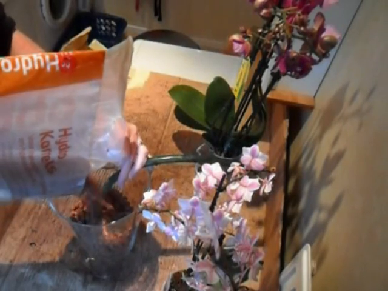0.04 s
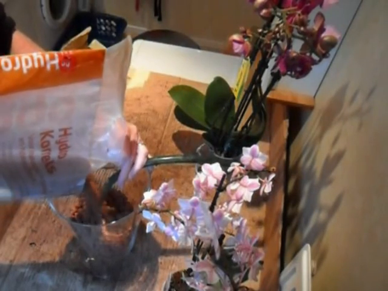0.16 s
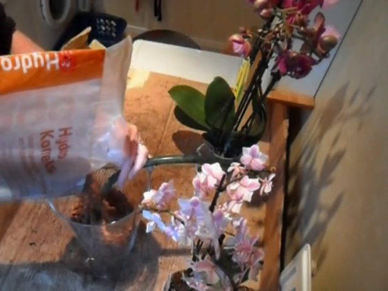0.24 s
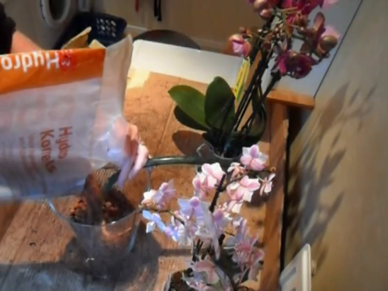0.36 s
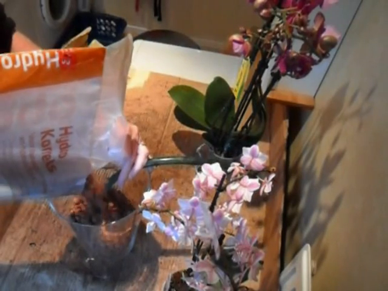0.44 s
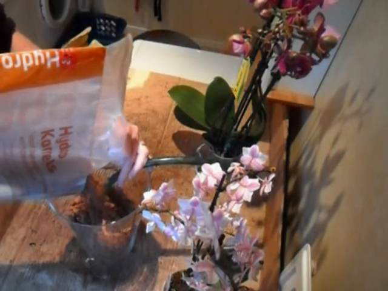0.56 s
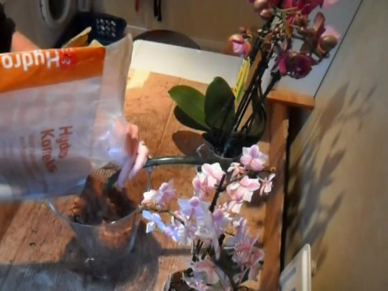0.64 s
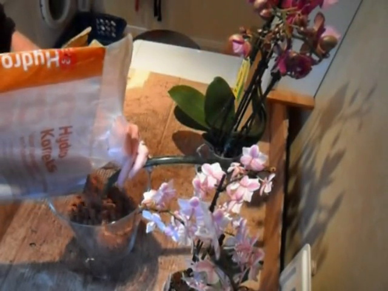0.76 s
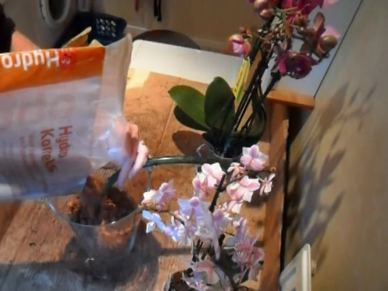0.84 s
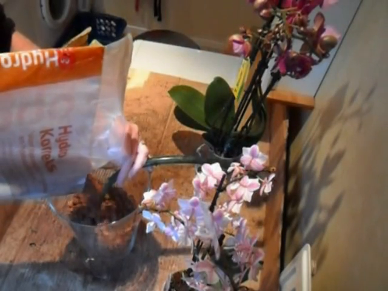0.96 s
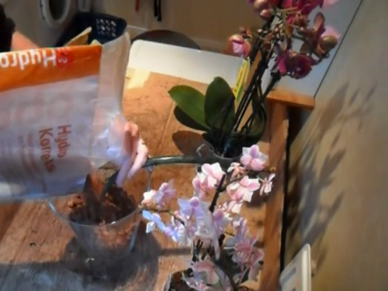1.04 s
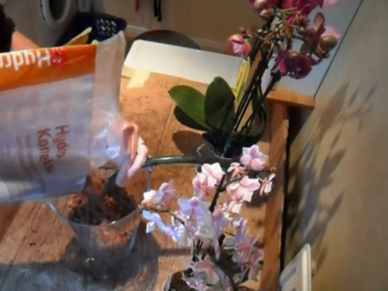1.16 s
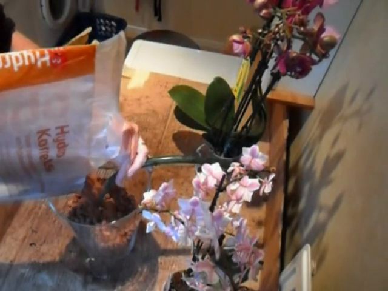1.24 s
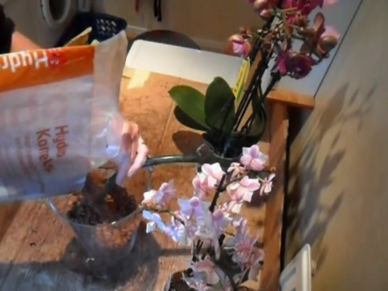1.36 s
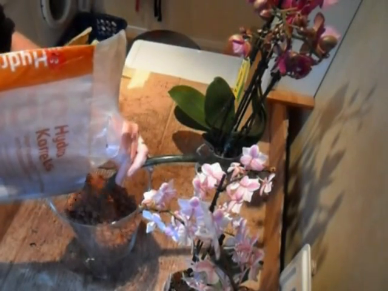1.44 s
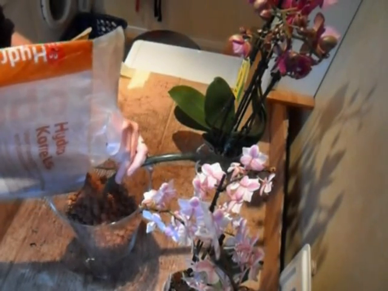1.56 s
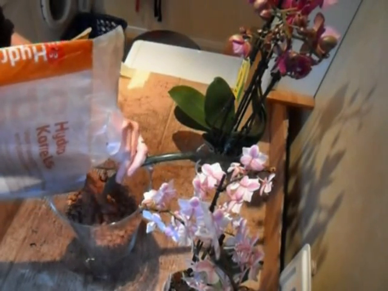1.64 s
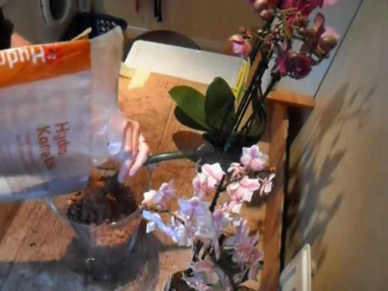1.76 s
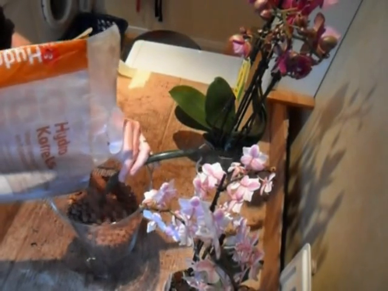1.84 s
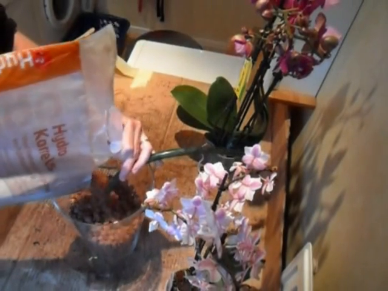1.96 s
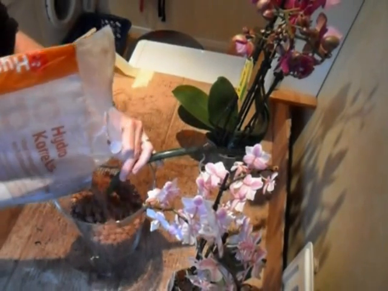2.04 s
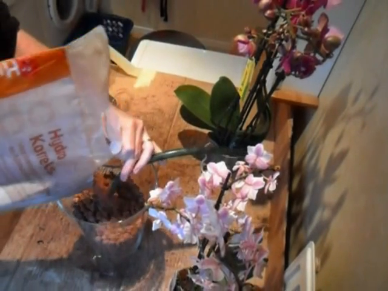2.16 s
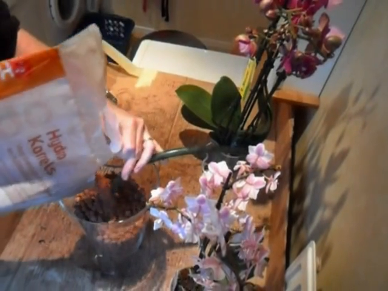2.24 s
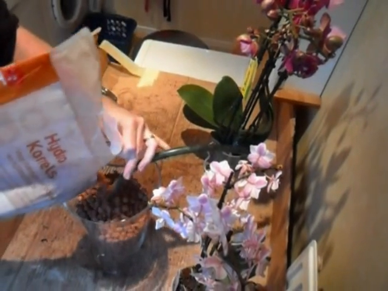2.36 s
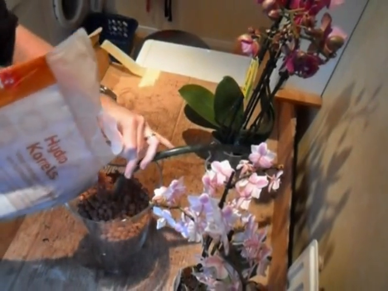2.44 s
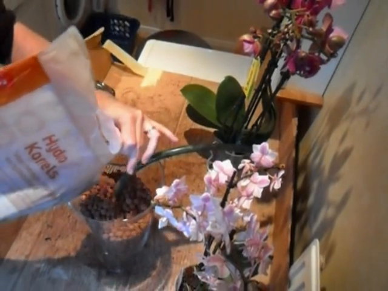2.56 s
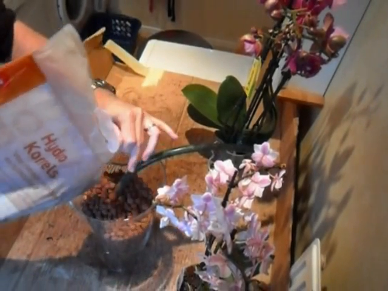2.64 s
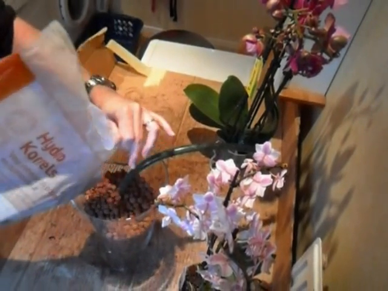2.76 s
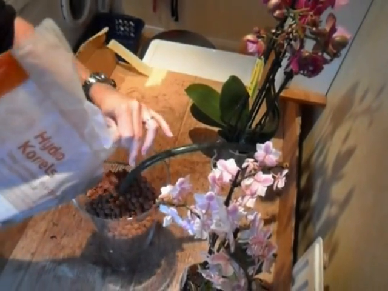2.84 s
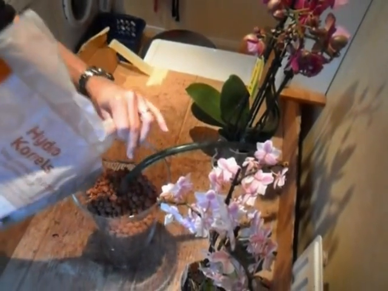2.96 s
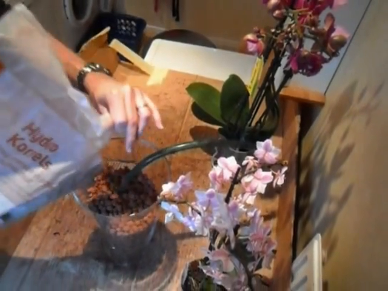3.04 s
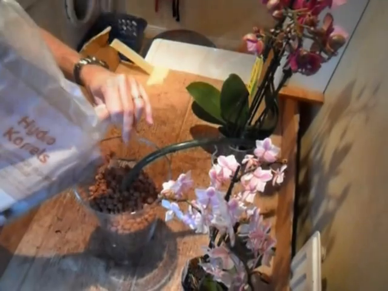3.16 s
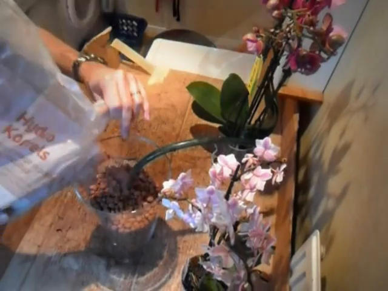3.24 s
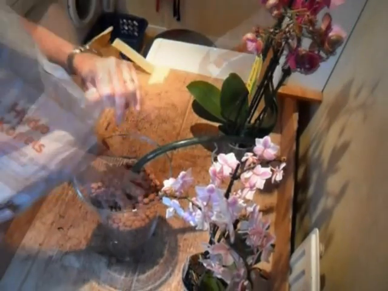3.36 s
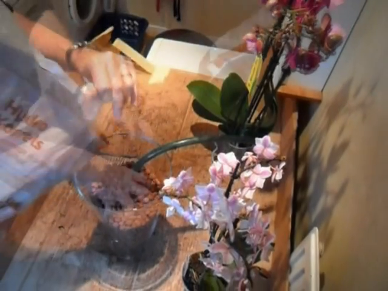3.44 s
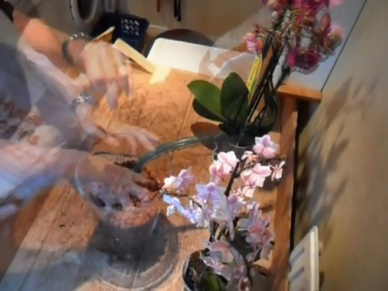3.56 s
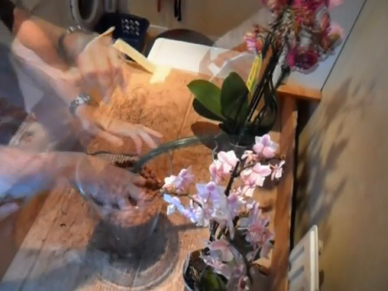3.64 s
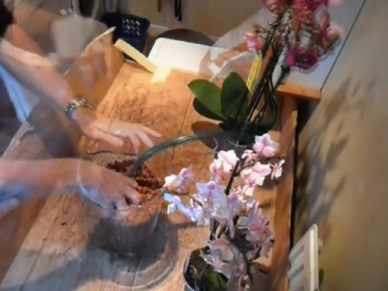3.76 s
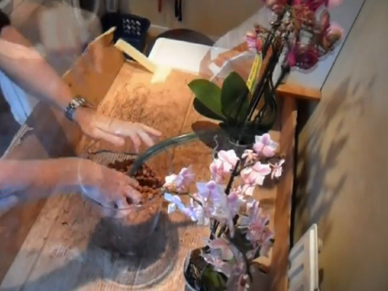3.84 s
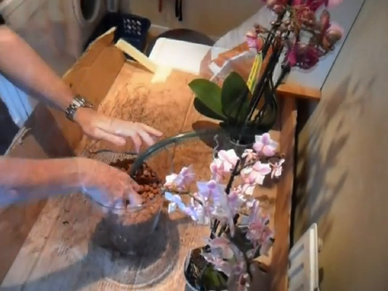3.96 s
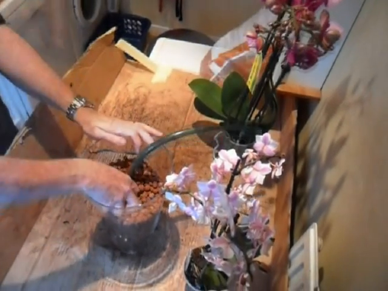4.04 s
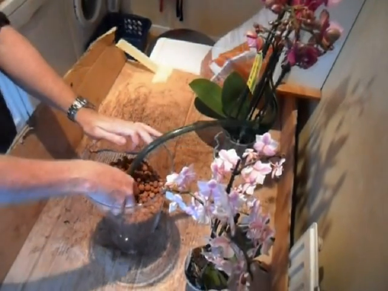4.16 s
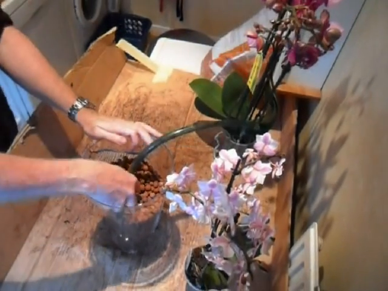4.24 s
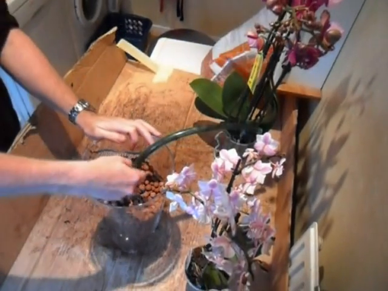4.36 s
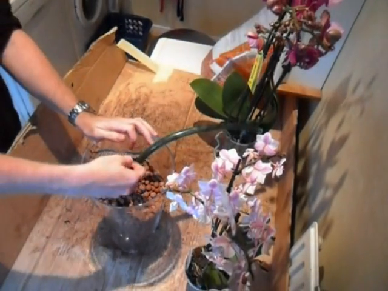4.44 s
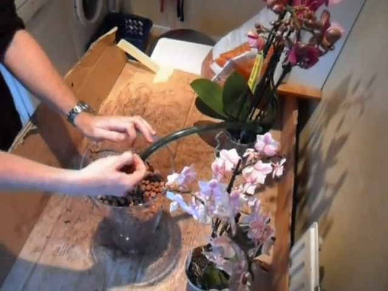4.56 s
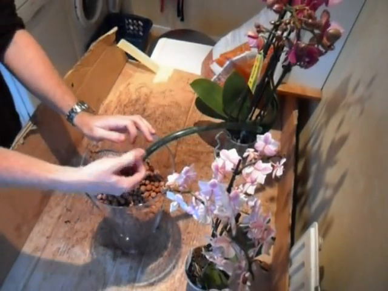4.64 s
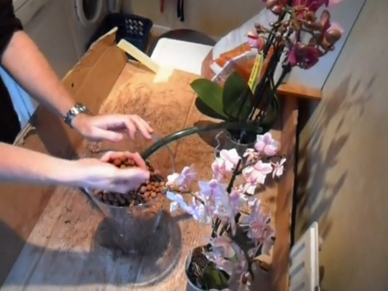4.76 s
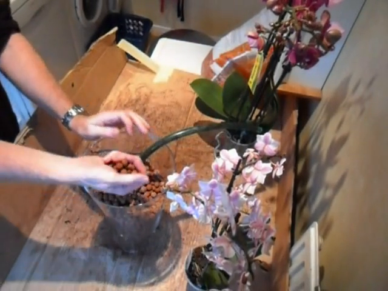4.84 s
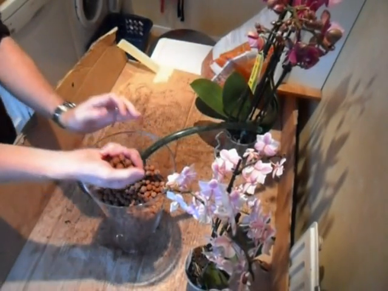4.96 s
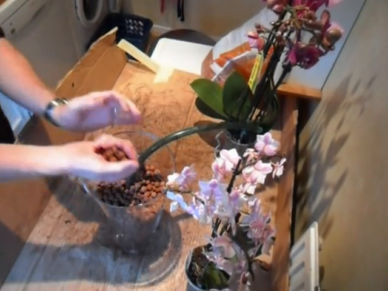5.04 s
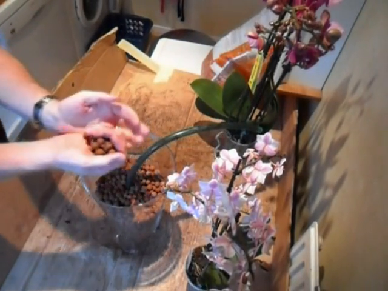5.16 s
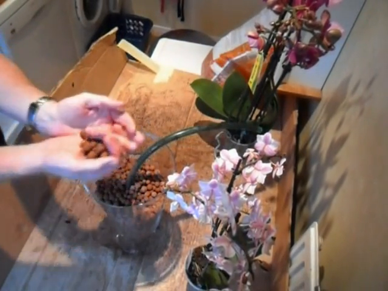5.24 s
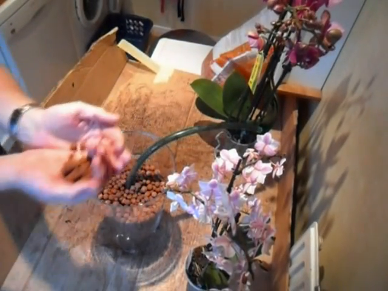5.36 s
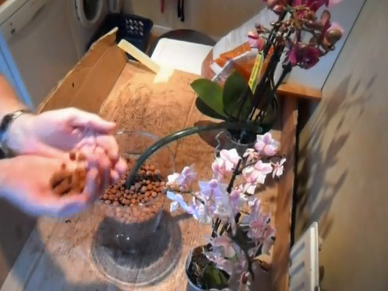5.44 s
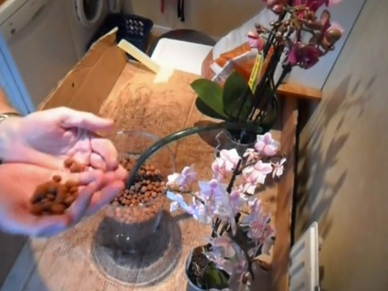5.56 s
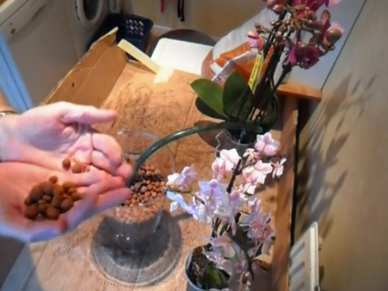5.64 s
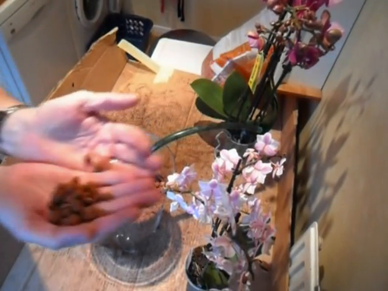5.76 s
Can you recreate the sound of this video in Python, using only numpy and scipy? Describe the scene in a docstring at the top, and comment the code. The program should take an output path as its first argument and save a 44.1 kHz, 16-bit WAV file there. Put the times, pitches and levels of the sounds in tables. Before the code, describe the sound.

The sound begins mid-pour. From 0 to about 1 second, hard clay pellets clatter densely into a glass vase, with sharp irregular clacks, a bright glassy ring and a soft hollow patter beneath. From 1 to 2.4 seconds the stream weakens and the ring becomes shorter and duller as the vase fills; one last strong clack comes near 2.4. Until 3.3 the pellets thin to single clicks while the plastic bag ticks, knocks and rustles dully as it is lifted. Around 3.35 there is a low soft thud, with further bumps near 3.55 and 3.7. Two short digs into the pellets rattle and grind at about 3.75 and 4.1, the second with a brief hum of the wall. Tiny ticks follow, then two muffled thumps near 4.9 and 5.0. Quiet room hiss and a low rumble, easing after 4 seconds, remain to the end. The room is small, with a short tail.

```python
"""Fired clay pellets pour from a plastic bag into a glass vase in a small room.
Random collisions make them patter on the heap and clack on the glass, whose wall and air ring as modes.
The stream thins to separate clicks; the bag crinkles, rustles and bumps as shaped noise and damped tones.
A hand then digs twice into the pellets: they rattle and grind, and soft thumps follow.
"""
import sys
import numpy as np
from scipy import signal
from scipy.fft import rfft, irfft, next_fast_len
from scipy.io import wavfile

SR = 44100
rng = np.random.default_rng(int(sys.argv[2]) if len(sys.argv) > 2 else 0)


def dump_mix(stems):
    """Bounce the given channels to the path in sys.argv[1] as a 16-bit WAV at rate SR."""
    frames = np.atleast_2d(stems).T  # one column per channel
    limited = np.clip(frames, -1, 1)  # hard clip at full scale
    pcm = np.round(limited * 32767).astype(np.int16)
    wavfile.write(sys.argv[1], SR, pcm)


N = 255773
TOP_HZ = 10900  # no room air and no pellet pitch above this


def amp(db):
    """Decibels to gain."""
    return 10 ** (np.asarray(db) / 20)


def unit(x):
    """Scale to rms 1."""
    return x / np.sqrt(np.mean(x ** 2) + 1e-20)


def along(points, hz):
    """Read (Hz, value) points on a log frequency axis."""
    f, v = np.transpose(points)
    return np.interp(np.log(hz + 1), np.log(f), v)


def filtered(x, response):
    """Multiply the spectrum of x by a response of frequency."""
    m = next_fast_len(N + SR // 2)
    hz = np.fft.rfftfreq(m, 1 / SR)
    return irfft(rfft(x, m) * response(hz), m)[:N]


def coloured(x, spectrum, size=4096):
    """Causal minimum-phase filter of energy 1 with the given spectrum."""
    hz = np.fft.rfftfreq(size, 1 / SR)
    cepstrum = irfft(np.log(amp(along(spectrum, hz))))
    # folding the cepstrum forward in time makes the kernel causal
    cepstrum[1:size // 2] *= 2
    cepstrum[size // 2 + 1:] = 0
    kernel = irfft(np.exp(rfft(cepstrum)))
    return signal.fftconvolve(x, kernel / np.linalg.norm(kernel))[:len(x)]


def add(track, s, sound):
    """Mix a sound into a track at time s."""
    start = max(0, round(s * SR))
    part = track[start:start + len(sound)]
    part += sound[:len(part)]


def contacts(rate, spread_db, size):
    """Random impulses of uneven strength, at a mean rate per second, rms 1."""
    hit = rng.random(size) < rate / SR
    sign = rng.choice([-1, 1], size)
    strength = amp(spread_db * np.clip(rng.standard_normal(size), -2, 2))
    return unit(hit * sign * strength)


def chatter(rate, spread_db, t60):
    """Pellet collisions, each a short decaying rasp of rough clay, rms 1."""
    t = np.arange(SR // 20) / SR
    hits = contacts(rate, spread_db, N)
    power = signal.fftconvolve(hits ** 2, amp(-60 * t / t60) ** 2)[:N]
    return unit(np.sqrt(np.abs(power)) * rng.standard_normal(N))


def stroke(s, rise, hold, release):
    """Gain of one movement: it swells, holds and fades, linearly in dB."""
    range_db = 23  # below full level at the start of the rise and the end of the release
    t = np.arange(N) / SR - s
    short = np.maximum(1 - t / rise, 0) + np.maximum((t - rise - hold) / release, 0)
    return amp(-range_db * short)


def pellets(rate, scatter=0.3, cycles=11, size=96):
    """Single clicks: every pellet rings for a few cycles at the pitch of its own size, rms 1."""
    typical_hz = 6800
    count = int(rate * N / SR)
    start = rng.integers(0, N, count)
    pitch, strength = np.clip(rng.standard_normal((count, 2)), -2, 2).T[:, :, None]
    hz = typical_hz * np.exp(scatter * pitch)
    turns = hz * np.arange(size) / SR
    # a click falls 60 dB in the given number of cycles
    clicks = (hz < TOP_HZ) * amp(4 * strength - 60 * turns / cycles) * np.sin(2 * np.pi * turns)
    places = start[:, None] + np.arange(size)
    return unit(np.bincount(places.ravel(), clicks.ravel(), N)[:N])


# resonances of the air in the vase: (frequency [Hz], width [Hz], relative level [dB])
AIR_MODES = [(228, 22, -9), (281, 22, 1), (328, 36, -3), (383, 38, 3)]


def vase_air():
    """Small landings drum on the hollow of the vase, a bank of resonances, rms 1."""
    def cavity(f):
        response = 0
        for k, (centre, width, db) in enumerate(AIR_MODES):
            mode = 1j * f * width / (centre * centre - f * f + 1j * f * width)
            response = response + (-1) ** k * amp(db) * mode
        return response

    return unit(filtered(contacts(400, 2.2, N), cavity))


def fullness(s):
    """As the bag is raised the full stream (1) thins to separate clicks (0)."""
    return np.interp(s, [1.8, 2.8], [1, 0])


# the stream from the bag: (time [s], flow strength [dB])
FLOW = [(0.0, -36.5), (0.28, -38.7), (0.8, -37.7), (1.05, -42.5), (1.38, -41), (1.47, -47.5), (1.6, -41),
        (2.3, -43.7), (2.55, -49.5), (2.85, -59.5), (3.1, -79)]
# spectrum of pellets clicking: (frequency [Hz], relative level per Hz [dB])
CLAY_SPECTRUM = [(100, -44), (300, -46), (1200, -14), (2100, -4.3), (3100, -3.7), (3900, -5.8), (4900, -.5),
                 (6200, 1), (6650, -3), (7100, 1), (7600, -1.5), (9600, 1.5), (11000, -5.5)]
# spectrum of landings on the heap: (frequency [Hz], relative level per Hz [dB])
HEAP_SPECTRUM = [(100, -28), (170, -15), (240, -5), (500, -2.5), (680, 3.5), (1100, 2.5), (1500, -3),
                 (2000, 0.5), (3200, -6), (6000, -6.5), (11000, -15)]


def stream():
    """Falling pellets click on each other, patter on the heap and stir the air in the vase."""
    full_db = -37  # full flow
    patter_db, hollow_db = -44.2, -51.7  # levels at full flow
    patter_follows, hollow_follows = .42, .7  # dB lost for each dB of flow
    t = np.arange(N) / SR
    flow_db = np.interp(t, *np.transpose(FLOW), right=-200)
    drop_db = flow_db - full_db
    full = fullness(t)
    dense = chatter(rate=600, spread_db=3.5, t60=.007)
    sparse = chatter(rate=160, spread_db=3, t60=.007)
    rasp = coloured(np.sqrt(full) * dense + np.sqrt(1 - full) * sparse, CLAY_SPECTRUM)
    clicks = .6 * pellets(rate=450)
    clatter = amp(flow_db - 1) * (rasp + clicks)
    landings = chatter(rate=800, spread_db=3, t60=.008)
    patter = amp(patter_db + patter_follows * drop_db) * coloured(landings, HEAP_SPECTRUM)
    hollow = amp(hollow_db + hollow_follows * drop_db) * vase_air()
    return clatter, patter + hollow


# clumps striking the glass: (time [s], level [dB], time for their bounces to fall 20 dB [s])
CLACKS = [(.001, -20, .04), (.011, -14, .05), (.036, -21, .04), (.077, -17.5, .07), (.096, -14, .06),
          (.108, -17, .04), (.134, -16.5, .07), (.162, -21, .05), (.203, -21, .02), (.221, -19, .03),
          (.227, -16, .035), (.283, -17, .025), (.296, -20, .03), (.308, -20, .03), (.3316, -20, .02),
          (0.3592, -10, .02), (.377, -21, .03), (.429, -17, .03), (.447, -16.5, .025), (0.4644, -13, .04),
          (.487, -17.5, .03), (.523, -17, .03), (.5516, -18, .03), (.577, -18, .04), (.616, -13.5, .03),
          (.641, -18.5, .04), (0.6775, -13, .04), (.69, -17, .04), (.719, -18, .04), (.746, -17, .035),
          (.764, -20, .035), (.795, -17.5, .04), (0.8083, -16, .06), (0.8718, -12, .014), (.892, -17, .04),
          (.9016, -15, .04), (.937, -18, .08), (.967, -15.5, .04), (.979, -17, .04), (1.002, -23, .03),
          (1.016, -24, .015), (1.055, -23, .015), (1.102, -24, .05), (1.115, -19, .05), (1.135, -17, .05),
          (1.161, -23, .03), (1.18, -23, .04), (1.198, -22, .03), (1.2055, -14.5, .06), (1.238, -22, .03),
          (1.262, -23, .03), (1.297, -20, .025), (1.324, -24, .025), (1.338, -23, .02), (1.357, -22, .02),
          (1.3618, -15.7, .04), (1.394, -17, .05), (1.421, -22, .03), (1.4257, -20, .03), (1.488, -26, .02),
          (1.5115, -21, .012), (1.532, -25, .02), (1.55, -20, .05), (1.577, -17.5, .04), (1.646, -18, .05),
          (1.663, -15, .07), (1.69, -19, .06), (1.718, -21, .04), (1.788, -18, .03), (1.807, -24, .02),
          (1.821, -22, .025), (1.855, -22, .015), (1.875, -25, .02), (1.893, -16.5, .035),
          (1.92, -20.5, .025), (1.941, -18.5, .025), (1.979, -27, .012), (1.9984, -17.5, .02),
          (2.0205, -23.5, .02), (2.0395, -16, .035), (2.065, -25, .04), (2.126, -24, .015),
          (2.156, -24, .02), (2.172, -24, .015), (2.2019, -17.5, .025), (2.226, -26, .025),
          (2.241, -18.5, .035), (2.26, -21, .025), (2.298, -25, .03), (2.307, -24, .03),
          (2.34, -18.5, .035), (2.38, -26, .02), (2.4172, -15.5, .042), (2.536, -29, .035),
          (2.6178, -27, .025), (2.748, -24, .018), (2.775, -25, .03), (3.5155, -27.5, .035),
          (3.5374, -29, .055), (3.813, -34, .02), (4.062, -33, .04), (4.088, -33, .02), (4.193, -35, .015),
          (4.2095, -27, .07), (4.4785, -42, .02), (4.5798, -42, .05), (4.618, -47, .025),
          (4.7375, -38.5, .04)]
# spectrum of the duller body of a clack: (frequency [Hz], relative level per Hz [dB])
BODY_SPECTRUM = [(300, -19), (1000, -8), (2000, 11), (3200, 9), (5000, 8), (9000, -13)]


def clacks(crack_t60=0.03, rise=0.0012, spill_db=-8.5, body_db=-25):
    """Clumps of pellets hit the wall: a hard noisy crack, then a spill of smaller bounces."""
    edge, body, t = np.zeros(N), np.zeros(N), np.arange(SR // 5) / SR
    for s, db, spill in CLACKS:
        # row 0 feeds the edge, row 1 the body
        crack = amp(-60 * t / crack_t60) * rng.standard_normal((2, len(t)))
        hits = np.array([contacts(3200, 3.3, len(t)) for _ in crack])
        bounces = amp(spill_db - 20 * t / spill) * hits
        blow = amp(db) * (1 - np.exp(-t / rise)) * (crack + bounces)
        # each blow stresses a band of its own
        band = signal.iirpeak(rng.uniform(4500, 10000), 5, SR)
        own = signal.lfilter(*band, blow[0])
        add(edge, s, amp(-7.5) * (blow[0] + own))
        add(body, s, amp(body_db) * blow[1])
    return coloured(edge, CLAY_SPECTRUM) + coloured(body, BODY_SPECTRUM)


def glass(blows, modes):
    """The wall rings in decaying modes; blows land all round it and so push them either way."""
    t = np.arange(SR // 2) / SR
    ring = sum(amp(db - 60 * t / t60) * np.sin(2 * np.pi * hz * t) for hz, db, t60 in modes)
    pushes = blows * rng.choice([-1, 1], N)
    return signal.fftconvolve(pushes, ring / np.linalg.norm(ring))[:N]


# modes of the free wall: (frequency [Hz], relative level [dB], t60 [s])
FREE_WALL = [(1997, -13, .12), (2729, -10, .15), (3203, -9, .16), (4091, -13, .15), (4653, -7, .15),
             (4963, -2.5, .13), (5113, -2, .13), (5524, -5, .15), (5922, -1, .12), (6131, -1, .13),
             (6353, -3, .15), (6983, -3, .1), (7374, -7, .15), (7939, -7, .15), (8398, -9, .15),
             (8753, -6, .12), (9368, -6, .1), (10138, -7, .15)]
# modes of the wall damped by pellets packed against it: (frequency [Hz], relative level [dB], t60 [s])
FILLED_WALL = [(1130, -13, .05), (2060, -7, .08), (2440, -8, .06), (2630, -7, .06), (3150, -6, .06),
               (5125, 0, .07), (5310, -1, .05), (5890, -2, .06), (6100, 0, .07), (7060, 2, .08),
               (7260, -1, .06), (7900, -4, .06), (9400, -2, .05)]
# the packed pellets take over the ring of the wall: (from [s], to [s])
FILL_SPAN = (1.2, 2.3)


def vase(blows, grind):
    """The wall rings brightly at first and more dully once it is full; grinding pellets rub it too."""
    free_db, filled_db, grind_db = -10.3, -13, -9  # ring over the sounds that drive it
    packed = np.interp(np.arange(N) / SR, FILL_SPAN, [0, 1])
    free = amp(free_db) * np.sqrt(1 - packed) * blows
    damped = amp(filled_db) * np.sqrt(packed) * blows + amp(grind_db) * grind
    return glass(free, FREE_WALL) + glass(damped, FILLED_WALL)


# decay of the room: (frequency [Hz], t60 [s])
ROOM_DECAY = [(200, 0.25), (1500, 0.56), (5000, 0.26), (11000, 0.16)]


def room(x, wet_db=-7, gap=.003, count=12):
    """A short diffuse noise tail, decaying per band; it crossfades to other echoes every 30 ms."""
    hz, t, z = signal.stft(rng.standard_normal((count, SR // 3)), SR, nperseg=256)
    decay = amp(-60 * t / along(ROOM_DECAY, hz)[:, None])
    tails = signal.istft(z * decay, SR, nperseg=256)[1]
    tails = tails / np.linalg.norm(tails, axis=1, keepdims=True)
    tails = np.pad(tails, ((0, 0), (round(gap * SR), 0)))
    # the tails take turns, so that sounds from different spots meet different echoes
    spot = np.arange(N) / SR / .03
    distance = np.abs((spot - np.arange(count)[:, None] + 1) % count - 1)
    shares = np.cos(np.pi / 2 * np.minimum(distance, 1))
    wet = signal.fftconvolve(x * shares, tails, axes=1)[:, :N].sum(axis=0)
    return x + amp(wet_db) * wet


# spectrum of the room air and hiss: (frequency [Hz], relative level [dB])
AIR_SPECTRUM = [(12, -40), (20, -9), (53, 0.5), (107, -11), (159, -3.5), (206, -4), (241, -5.5),
                (275, -3.5), (397, -6.5), (744, -10), (1070, -12.5), (1190, -12.5), (7090, -18),
                (10500, -22), (13600, -57.5), (22000, -120)]
# spectrum of the low rumble: (frequency [Hz], relative level [dB])
RUMBLE_SPECTRUM = [(12, -37), (20, 7), (32, -6), (81, 8.5), (107, -0.5), (135, 7), (162, -12), (200, -10),
                   (260, -38.5), (440, -120)]


def background(rumble_db=-69, rest_db=-74.5):
    """Steady room air and hiss as shaped noise, over a low rumble that eases from 3.9 to 4.4 s."""
    air = unit(filtered(rng.standard_normal(N), lambda f: amp(along(AIR_SPECTRUM, f)) * (f < TOP_HZ)))
    rumble = unit(filtered(rng.standard_normal(N), lambda f: amp(along(RUMBLE_SPECTRUM, f))))
    level_db = np.interp(np.arange(N) / SR, [3.9, 4.4], [rumble_db, rest_db])
    return amp(-63.0) * air + amp(level_db) * rumble


# clumps landing on the heap: (time [s], peak level [dB])
BOOMS = [(.572, -40), (.75, -42), (1.053, -41), (1.287, -40), (1.52, -43), (2.025, -42), (2.955, -43),
         (3.1, -44), (3.548, -45)]


def booms(rise=.004):
    """A heavy landing rings the air in the vase: each resonance decays by its own width."""
    out, t = np.zeros(N), np.arange(SR // 6) / SR
    for s, db in BOOMS:
        ring = np.zeros(len(t))
        for hz, width, level in AIR_MODES:
            decay = np.exp(-np.pi * width * t)
            ring += amp(level + rng.normal(0, 2)) * decay * np.sin(2 * np.pi * hz * t)
        ring = ring * (1 - np.exp(-t / rise))
        add(out, s, amp(db) * ring / np.abs(ring).max())
    return out


# knocks of the bag and the hands:
# (time [s], level [dB], centre [Hz], crack over level [dB], softness [time stretch])
KNOCKS = [(2.446, -25, 1300, -10, 1), (2.459, -26.5, 850, -15, 1.1), (2.524, -33, 1060, -12, 1.2),
          (2.93, -29.5, 1050, -15, 1), (2.954, -33, 310, -16, 2.4), (2.956, -31, 1200, -19, .9),
          (3.096, -38, 330, -16, 2.4), (3.106, -31.5, 900, -4, 1.2), (3.1062, -28, 3100, -11, .6),
          (3.13, -40, 1000, -5, 2.5), (3.25, -41, 620, -12, 1.6), (3.328, -35, 2060, -11, .8),
          (3.358, -41, 1500, -4, 2.4), (3.539, -33, 2600, -7, 1), (3.546, -26, 940, -13, 1.6),
          (3.562, -38, 900, -4, 3), (3.724, -35, 800, -13, 2)]
# the dull ring that they share: (ratio to the centre, relative level [dB])
KNOCK_MODES = [(.68, -7), (.86, -2), (1.17, -1), (1.55, -6)]
# spectrum of their crack: (frequency [Hz], relative level per Hz [dB])
CRACK_SPECTRUM = [(100, -43), (300, 1.5), (1000, 1.5), (2000, -2.5), (3600, -1), (5500, -5), (10000, -12)]


def knocks(t60=0.03, rise=0.0006, ring_db=-8, crack_t60=0.028):
    """Bumps: a few well damped modes struck at once, under a rough crack of noise."""
    out, cracks, t = np.zeros(N), np.zeros(N), np.arange(SR // 6) / SR
    for s, db, hz, crack_db, slow in KNOCKS:
        tone = np.zeros(len(t))
        for ratio, level in KNOCK_MODES:
            push = amp(level) * rng.choice([-1, 1])
            mode_hz = hz * ratio * rng.normal(1, .03)
            tone += push * np.sin(2 * np.pi * mode_hz * t)
        # a softer contact swells and dies more slowly
        age = t / slow
        add(out, s, amp(db + ring_db - 60 * age / t60) * (1 - np.exp(-age / rise)) * tone)
        add(cracks, s, amp(db + crack_db - 60 * age / crack_t60) * rng.standard_normal(len(t)))
    return out + coloured(cracks, CRACK_SPECTRUM)


# creases of the bag and single pellets ticking: (time [s], level [dB])
TICKS = [(2.4830, -31), (2.5249, -32), (2.5766, -29), (2.6055, -34), (2.6634, -35), (2.6809, -35),
         (2.7118, -33), (2.8166, -33), (2.8535, -37), (2.9009, -38), (3.031, -35), (3.0914, -37),
         (3.1668, -33.5), (3.1857, -37), (3.2421, -38), (3.2631, -39), (3.2965, -40), (3.3957, -36.5),
         (3.4197, -39), (3.4679, -35.5), (3.489, -42), (3.7151, -42), (3.7759, -38), (3.9321, -39),
         (3.9912, -35.5), (4.3337, -44), (4.4609, -47), (4.4795, -44), (4.5045, -50), (4.5815, -45),
         (4.6197, -48), (4.6794, -51), (4.7372, -36), (5.011, -52), (5.05, -47), (5.439, -47)]
# spectrum of the plastic film: (frequency [Hz], relative level per Hz [dB])
FILM_SPECTRUM = [(100, -38), (300, -3), (1500, -4), (4000, -4), (8000, -0.5), (11000, -2.5)]


def ticks(t60=0.011):
    """The plastic film and stray pellets make short dry ticks of decaying noise."""
    out, t = np.zeros(N), np.arange(SR // 30) / SR
    for s, db in TICKS:
        add(out, s, amp(db - 60 * t / t60) * rng.standard_normal(len(t)))
    return coloured(out, FILM_SPECTRUM)


# the bag lifted away: (start [s], rise [s], hold [s], release [s], level [dB])
LIFT = (2.74, .2, .2, 1.7, -52.5)
# spectrum of pellets sliding inside the bag: (frequency [Hz], relative level per Hz [dB])
SLIDE_SPECTRUM = [(100, -26), (220, -6), (500, -4), (680, 3), (1100, 2.5), (1500, -3), (2100, -2),
                  (3200, -6), (6000, -10), (11000, -19)]


def lifting(hollow_db=-7.5, film_db=-20):
    """Pellets slide back down the raised bag, a dull rustle over the mouth of the vase; the film swishes."""
    *shape, db = LIFT
    slides, creases = [chatter(rate=800, spread_db=3, t60=.008) for _ in range(2)]
    rustle = coloured(slides, SLIDE_SPECTRUM)
    swish = amp(film_db) * coloured(creases, FILM_SPECTRUM)
    hollow = amp(hollow_db) * vase_air()
    return amp(db) * stroke(*shape) * (rustle + swish + hollow)


# low hum of the bag being moved: (start [s], rise [s], hold [s], release [s], level [dB])
DRAG = (3.3, .2, .25, .6, -67.5)


def thud(s=3.349, hz=80, db=-46, t60=0.15, rise=.008):
    """The heavy bag bumps down with one low, soft thud; noise hums on that note while it is moved."""
    out, t = np.zeros(N), np.arange(SR // 2) / SR
    swell = 1 - np.exp(-t / rise)
    add(out, s, amp(db - 60 * t / t60) * swell * np.sin(2 * np.pi * hz * t))
    *shape, hum_db = DRAG
    hum = unit(signal.lfilter(*signal.iirpeak(hz, 14, SR), rng.standard_normal(N)))
    return out + amp(hum_db) * stroke(*shape) * hum


# the hand in the heap, two digs and a faint last stroke:
# (start [s], rise [s], hold [s], release [s], rattle level [dB], grinding level [dB])
SCOOPS = [(3.69, .12, .045, .3, -45.5, -44.5), (4.033, .033, .08, .25, -46.3, -45.7),
          (4.38, .08, .03, .6, -65, -70)]
# spectrum of pellets grinding: (frequency [Hz], relative level per Hz [dB])
GRIND_SPECTRUM = [(120, -14), (450, -15), (650, -2), (900, -6), (1130, -1), (1400, -8), (2500, -1),
                  (4000, -5), (10000, -15.5)]


def digging(scrape_db=-8):
    """Fingers push into the heap: pellets grind, rattle and catch on each other."""
    bright = sum(amp(db) * stroke(*shape) for *shape, db, _ in SCOOPS)
    dull = sum(amp(db) * stroke(*shape) for *shape, _, db in SCOOPS)
    clicks, rubs = [chatter(rate=800, spread_db=2.5, t60=.007) for _ in range(2)]
    # single pellets catch under the fingers
    rattle = coloured(clicks, CLAY_SPECTRUM) + amp(scrape_db) * pellets(rate=400)
    grind = amp(-3) * coloured(rubs, GRIND_SPECTRUM) + amp(-14.5) * vase_air()
    return bright * rattle, dull * grind


# pellets dragged along the wall: (start [s], rise [s], hold [s], release [s])
RUB = (4.09, .03, .03, .12)


def rubbing(db=-56):
    """Pellets dragged along the wall wake its lowest filled mode, which hums briefly."""
    hum = unit(glass(contacts(900, 2, N), FILLED_WALL[:1]))
    return amp(db) * stroke(*RUB) * hum


# hands gathering pellets: (time [s], level [dB], pitch [Hz], hold [s])
THUMPS = [(4.923, -54.5, 410, .018), (5.006, -54, 675, .018)]
# modes of a thump: (ratio to the pitch, relative level [dB])
THUMP_MODES = [(.79, -7), (1, 0), (1.57, -10)]
# spectrum of the skin's rustle: (frequency [Hz], relative level per Hz [dB])
SKIN_SPECTRUM = [(150, -12), (400, -2), (1000, 0), (2000, -2), (3000, -11), (10000, -28)]


def thumps(rise=.0035, fall=.06, rustle_db=-6):
    """Soft handling of the pellets: a brief hollow thump of three modes under a rustle of skin."""
    out, rustle, t = np.zeros(N), np.zeros(N), np.arange(SR // 8) / SR
    for s, db, hz, hold in THUMPS:
        gain = amp(db - 60 * np.maximum(t - hold, 0) / fall) * (1 - np.exp(-t / rise))
        tone = np.zeros(len(t))
        for ratio, level in THUMP_MODES:
            tone += amp(level) * np.sin(2 * np.pi * (hz * ratio * t + rng.random()))
        add(out, s, gain * tone)
        add(rustle, s, gain * rng.standard_normal(len(t)))
    return out + amp(rustle_db) * coloured(rustle, SKIN_SPECTRUM)


def scene():
    """Pellets, vase and bag in the room; the bumps close by are drier."""
    clatter, patter = stream()
    rattle, grind = digging()
    hard = clatter + rattle + clacks()
    soft = patter + booms() + grind + rubbing() + lifting()
    bumps = room(knocks() + thumps(), wet_db=-8.5, count=4)
    wet = room(hard + vase(hard, grind) + soft + ticks())
    return (wet + bumps + thud() + background())[None]


def record(dry):
    """A very steep low-pass ends the treble at its band limit."""
    corner_hz = TOP_HZ - 350
    return filtered(dry[0], lambda f: 1 / np.sqrt(1 + (f / corner_hz) ** 130))[None]


dry = scene()
out = record(dry)
dump_mix(out)
```